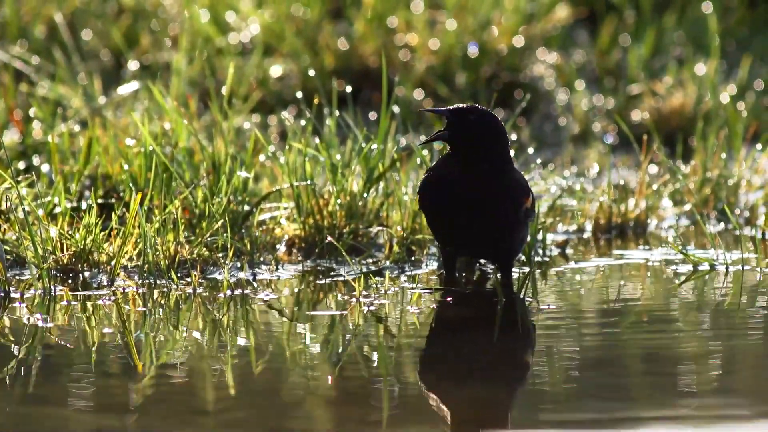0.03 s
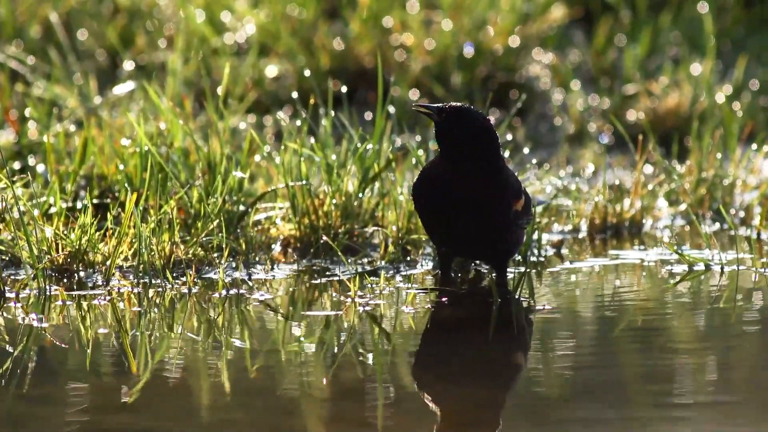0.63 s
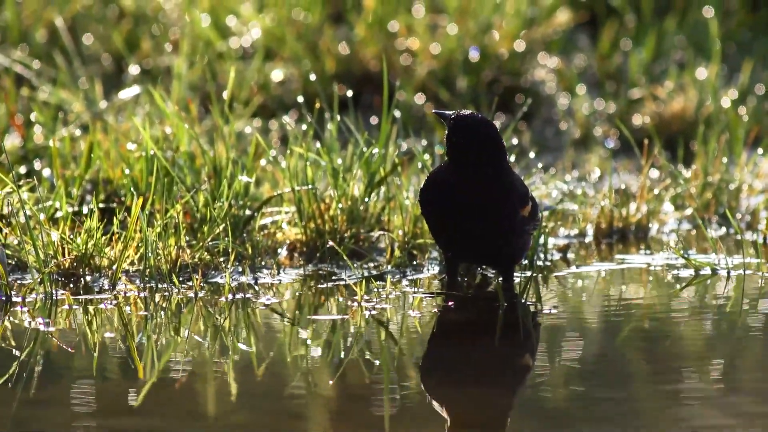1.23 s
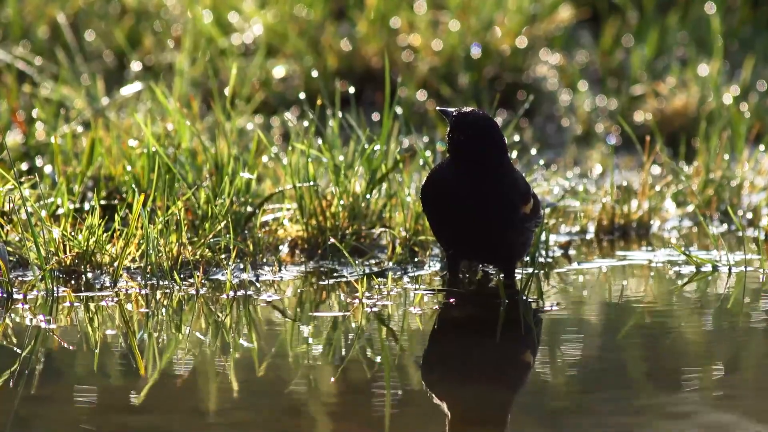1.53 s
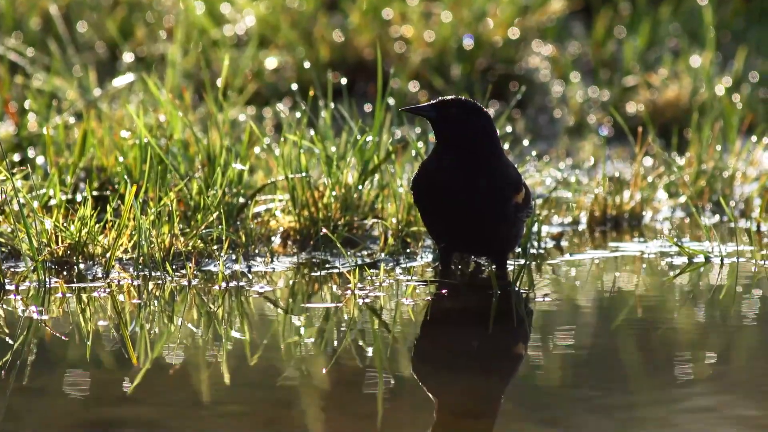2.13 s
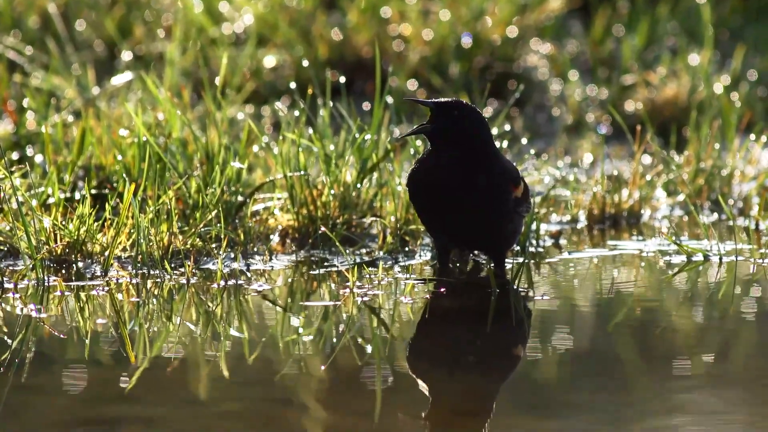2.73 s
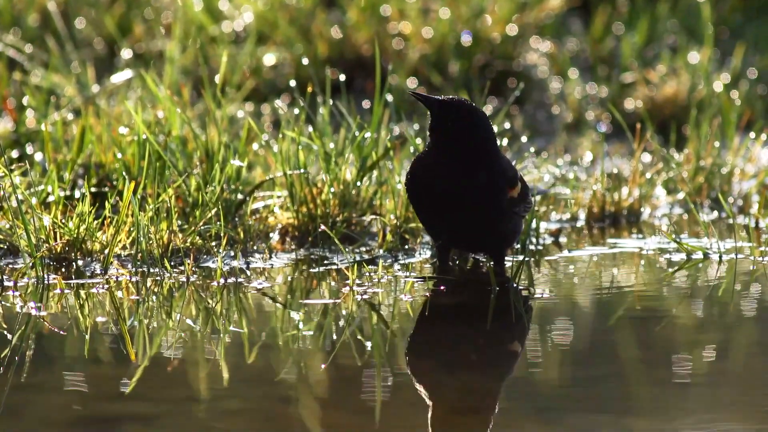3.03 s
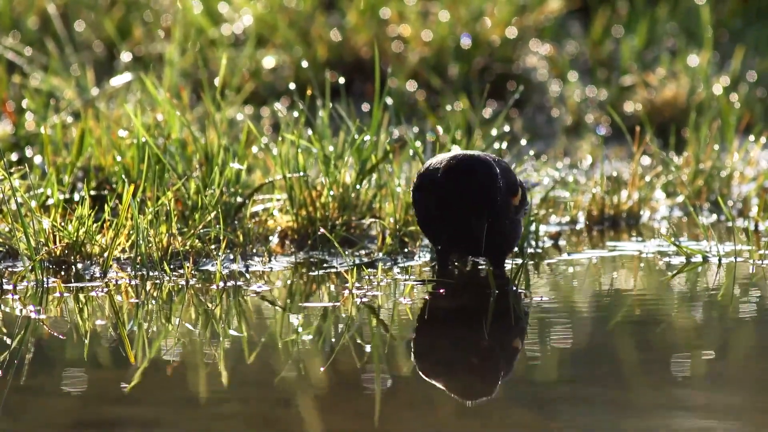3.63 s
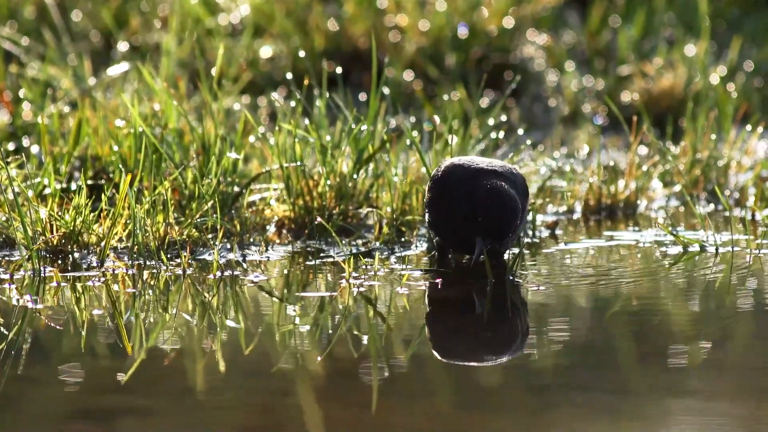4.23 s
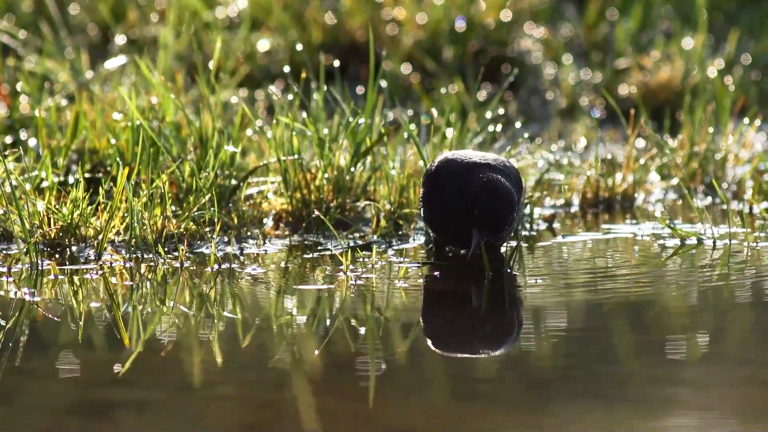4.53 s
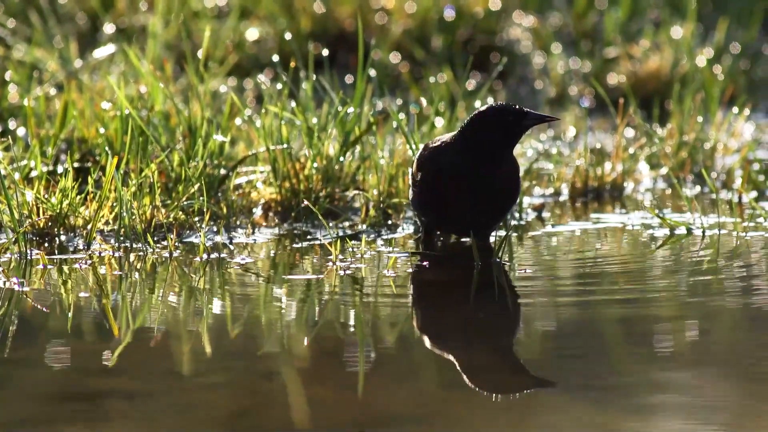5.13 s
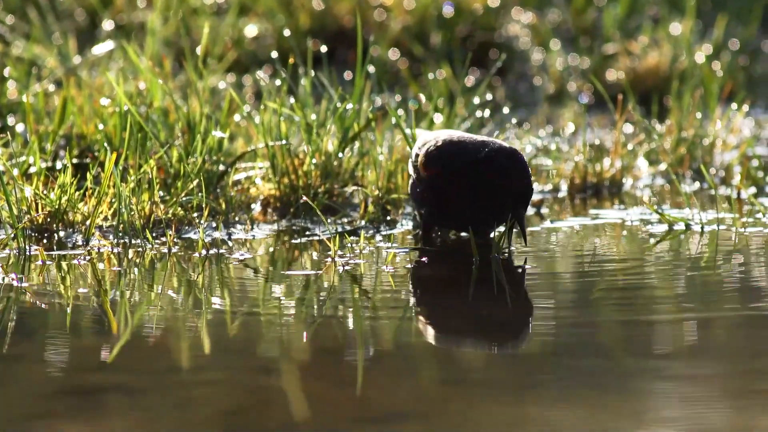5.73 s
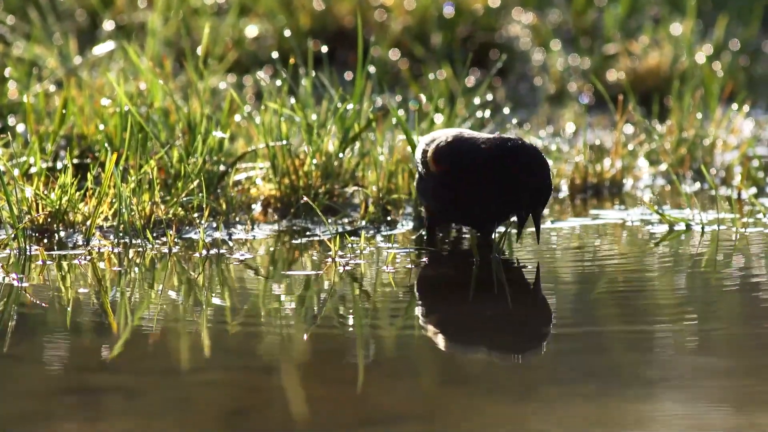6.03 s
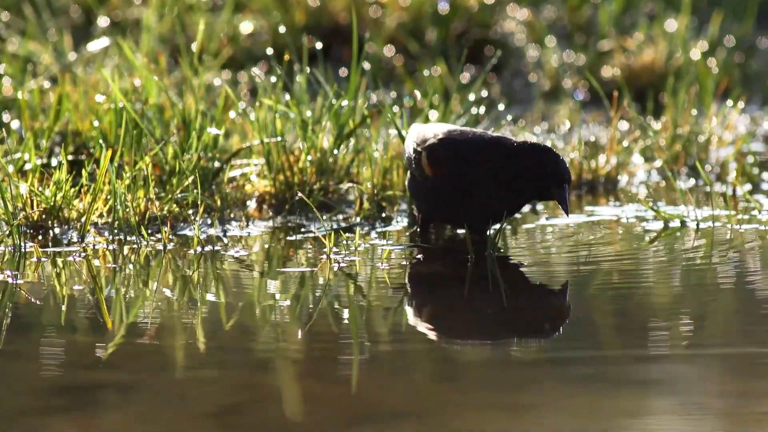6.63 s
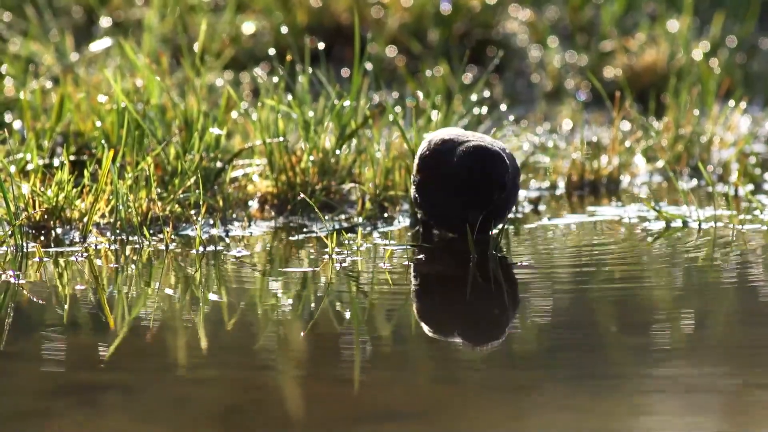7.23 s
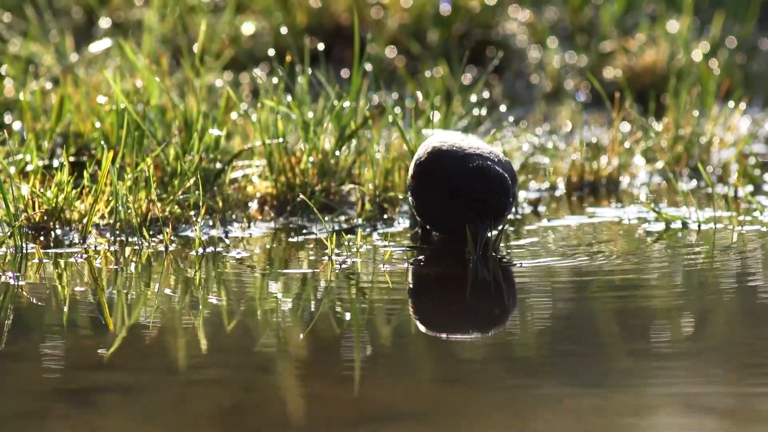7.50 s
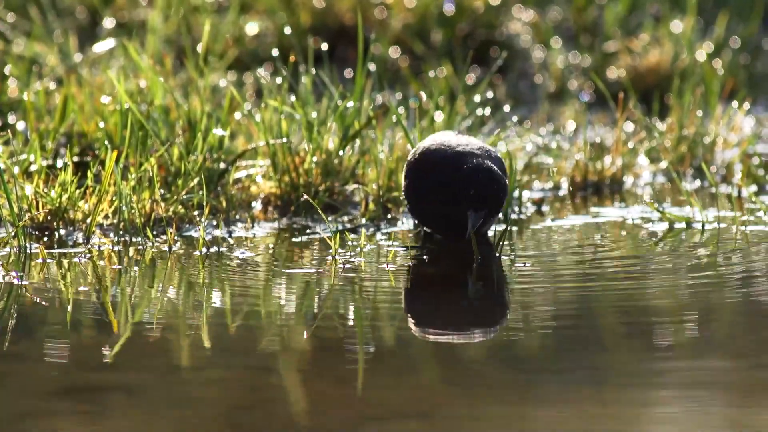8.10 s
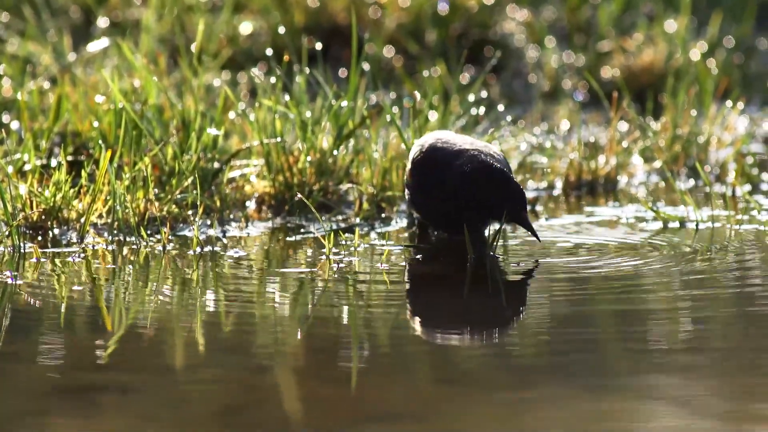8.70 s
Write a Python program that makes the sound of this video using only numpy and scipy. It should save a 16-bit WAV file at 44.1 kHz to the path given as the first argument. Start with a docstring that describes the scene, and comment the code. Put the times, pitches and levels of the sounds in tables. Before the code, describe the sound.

At the water's edge, a nearby blackbird gives a loud, high whistle that slides downward and rings briefly off the shore. It repeats three more times, a few seconds apart, the last two loudest. Farther off, small birds chip, warble and slur throughout, with a thin twitter and faint rustling around the third whistle. A steady distant rumble and occasional soft low thumps lie underneath.

```python
"""Lakeside, over distant rumble and soft low thumps. At 0 s a blackbird gives a loud falling whistle;
a close bank echoes it and the shore rings on. Small birds warble, check and chip farther off, with
slurs from 2 s. Faint far tones sound at 0.4 and 3.7 s, the second whistle and a dry tick between them.
From about 5 s come rustles, reedy rising calls and a thin twitter, with the third whistle at 5.6 s.
The fourth follows at 7.5 s; a few slurs and thumps end the scene."""
import sys
import numpy as np
from scipy import signal
from scipy.fft import rfft, irfft, next_fast_len
from scipy.io import wavfile
from scipy.ndimage import uniform_filter1d

SR = 44100
rng = np.random.default_rng(int(sys.argv[2]) if len(sys.argv) > 2 else 0)


def file_out(sig):
    """Save sig as 16-bit WAV at sys.argv[1]."""
    # one column per channel
    cols = np.atleast_2d(sig).T
    # limit, then scale
    lim = np.clip(cols, -1, 1)
    pcm = np.round(lim * 32767).astype(np.int16)
    wavfile.write(sys.argv[1], SR, pcm)


N = 390726
TIME_S = np.arange(N) / SR
CUTOFF_HZ = 15800

# outdoor background: freq_hz, relative_density_db
AIR_SPECTRUM = [(18, -26), (25, -13), (52, 3), (148, -1.5), (688, -10), (2650, -18.5), (5480, -19),
                (6990, -22.5), (14500, -25.5)]
# far tones: start_s, length_s, pitch_hz, level_db
FAR_NOTES = [(0.424, 0.63, 783, -62), (3.72, 0.47, 472.5, -58.5)]
# low thumps: start_s, level_db
THUMP_HITS = [(0.362, -44), (.43, -35), (1.664, -37), (4.105, -36.5), (4.225, -42), (6.97, -41.5),
              (7.098, -42.5), (7.25, -42.5), (7.958, -38), (8.791, -44.5)]
# high rustles: start_s, length_s, level_db
RUSTLE_PATCHES = [(4.787, 0.2, -58), (5.143, 0.65, -55.5), (6.253, 0.38, -55.5)]
# far bird's rising calls: start_s, length_s, second_partial_db
RISING_CALLS = [(5.218, 0.16, -58), (5.602, 0.16, -58), (6.498, .17, -54)]
# twitter dives: start_s, top_hz, level_db
TWITTER_DIVES = [(5.362, 6500, -53.5), (5.442, 5730, -57), (5.48, 7430, -51), (5.606, 6840, -50),
                 (5.723, 6660, -47.5), (5.824, 6400, -45.5), (5.845, 5300, -54), (5.926, 5950, -53)]
# high hooked notes ending the twitter: start_s
HOOK_STARTS_S = [6.13, 6.252, 6.374, 6.497]
# scratchy checks: start_s, top_hz, level_db
CHECK_CALLS = [(.715, 5700, -51), (1.04, 5670, -47.5), (4.291, 6470, -47), (4.549, 5720, -43),
               (6.987, 6470, -49), (7.058, 5340, -47.5), (7.17, 5620, -49), (7.514, 6300, -45),
               (7.664, 5900, -45)]
# sinking slurs: start_s, length_s, first_hz, bow_hz, relative_db
SLUR_NOTES = [(2.039, 0.14, 4335, 228, -41), (2.62, 0.15, 4180, 255, -41), (3.213, 0.15, 4150, 313, -40.5),
              (3.782, 0.19, 3967, 151.5, -46), (3.803, 0.15, 5700, -100, -39.5), (4.52, .21, 4530, 89, -42),
              (5.105, 0.14, 4060, 44, -47), (5.612, 0.16, 3890, 117, -51.5), (6.215, 0.17, 3930, 60, -58.5),
              (6.826, 0.16, 3830, 3, -54), (7.288, 0.21, 3860, 141, -53), (7.99, 0.079, 4130, -150, -52),
              (8.462, 0.16, 3990, 54, -51.5)]
# scooping warbles: start_s, length_s, first_hz, last_hz, relative_db
WARBLE_NOTES = [(0.255, .11, 3540, 4580, -54), (0.38, 0.12, 3720, 3790, -50.5),
                (0.651, 0.15, 3700, 4520, -55), (0.898, 0.12, 3840, 3860, -53),
                (0.95, 0.25, 3610, 5020, -53.5), (1.315, 0.19, 4040, 4100, -53),
                (1.489, .11, 3370, 3320, -58.5), (3.178, 0.07, 2960, 3920, -54.5),
                (3.366, 0.063, 4570, 5070, -49.5), (4.944, .045, 4890, 5100, -54),
                (7.923, .07, 3840, 4380, -54)]
# arched pips: start_s, base_hz
PIP_NOTES = [(1.26, 4250), (1.755, 4300), (4.13, 3400), (4.335, 3360), (7.09, 3550), (7.148, 3480)]
# diving chips: start_s, length_s, last_hz, level_db
CHIP_NOTES = [(0.899, 0.03, 4100, -48.5), (1.021, 0.038, 4400, -50), (1.156, 0.057, 4000, -45),
              (1.322, 0.054, 4000, -45), (1.487, 0.053, 3900, -43), (1.641, 0.063, 3850, -44.5),
              (1.806, 0.06, 3300, -45.5), (1.989, 0.053, 4200, -44), (2.343, 0.057, 3050, -46),
              (2.479, 0.073, 3800, -44.5), (2.693, 0.045, 4000, -41.5), (2.847, 0.057, 4000, -42),
              (3.029, 0.054, 3800, -43.5), (3.471, 0.055, 3150, -44), (3.615, 0.066, 3700, -42),
              (3.864, 0.049, 4300, -45.5), (4.54, 0.036, 4700, -46)]
# blackbird contours, one list of points per whistle: time_s, pitch_hz, level_db
WHISTLE_CURVES = [
    [(0.0, 7870, -18), (0.007, 7500, -35), (0.022, 7240, -39.5), (0.122, 7085, -33), (0.183, 6740, -27.5),
     (0.28, 6475, -21.5), (0.363, 5936, -24), (0.385, 5777, -17.5), (0.414, 5530, -16), (0.447, 5240, -21),
     (0.464, 5120, -30)],
    [(2.468, 8370, -44), (2.489, 7540, -30.5), (2.51, 7200, -28.5), (2.622, 6776, -28), (2.657, 6597, -19),
     (2.788, 6300, -23), (2.865, 6050, -23), (2.88, 6000, -15.5), (2.954, 5570, -11), (3.012, 5183, -18.5),
     (3.03, 5124, -24)],
    [(5.631, 8330, -37), (5.658, 7590, -30), (5.707, 7160, -19), (5.794, 6850, -20.5), (5.861, 6675, -18),
     (5.942, 6270, -12), (5.951, 6240, -18), (6.067, 5705, -13), (6.087, 5390, -7.5), (6.096, 5150, -11.5),
     (6.13, 5047, -22.5)],
    [(7.459, 8350, -26.5), (7.473, 7560, -23.5), (7.489, 7204, -22.1), (7.596, 6900, -24),
     (7.679, 6634, -14), (7.771, 6125, -18), (7.85, 5856, -10), (7.88, 5720, -9.5), (7.902, 5380, -8.5),
     (7.944, 5180, -11), (7.954, 5340, -20)],
]
# timbre per whistle: first_octave_db, last_octave_db, hollow_hz, bank_echo_db
WHISTLE_COLOURS = [(5, -2, 12000, 0), (1, -1, 12950, -5), (0.5, 1.5, 6800, -11), (-3.5, 10, 12100, -12)]
# close-bank echo per whistle: delay_s
BANK_DELAYS_S = [.00401, .00437, .00423, .00421]
# throat and beak response to the octave: freq_hz, gain_db
THROAT_RESPONSE = [(10000, -15.5), (10400, -28.5), (10850, -24.5), (11300, -41), (12400, -44), (13200, -44),
                   (13700, -34), (14200, -37.5), (15500, -50.5)]
# hoarse spells: start_s, length_s, flutter_hz, level_re_voice_db
HOARSE_SPELLS = [(0.303, 0.092, 1480, -34), (5.68, .21, 1380, -28.5), (7.572, 0.091, 1170, -28.5)]
# voice cracks near the whistle peaks: start_s, level_db
VOICE_CRACKS = [(2.882, -42), (5.988, -43.5), (7.838, -40)]


def from_db(db):
    """Decibels to gain."""
    return 10 ** (np.asarray(db) / 20)


def rms_one(x):
    """Scale to unit power."""
    return x / np.sqrt(np.mean(x ** 2) + 1e-20)


def band(x, low_hz, high_hz):
    """Gentle band-pass."""
    return signal.sosfilt(signal.butter(2, [low_hz, high_hz], "band", fs=SR, output="sos"), x)


def drift(rate_hz, size=N):
    """Smooth random wander, unit RMS."""
    hz = np.arange(size // 2 + 1) * SR / size
    return rms_one(irfft(rfft(rng.standard_normal(size)) / (1 + (hz / rate_hz) ** 2), size))


def sine(hz):
    """Unit-power tone along a pitch curve."""
    return np.sqrt(2) * np.sin(2 * np.pi * np.cumsum(hz) / SR)


def progress(length_s):
    """Ramp u from 0 to 1 over a note."""
    return np.linspace(0, 1, int(length_s * SR))


def swell(u, edge):
    """Rounded rise and fall, each the fraction edge of a note."""
    return np.sin(np.pi / 2 * np.clip(np.minimum(u, 1 - u) / edge, 0, 1))


def glide(u, first_hz, last_hz, bow_hz):
    """Pitch slide, bowed in the middle; positive is upward."""
    return first_hz + (last_hz - first_hz) * u + bow_hz * (1 - (2 * u - 1) ** 2)


def add(track, start_s, sound):
    """Mix a sound into a track."""
    at = int(start_s * SR)
    track[at:at + len(sound)] += sound[:N - at]


def delayed(x, delay_s):
    """Longer path: a fractional-sample delay."""
    size = next_fast_len(len(x) + SR // 10)
    hz = np.arange(size // 2 + 1) * SR / size
    return irfft(rfft(x, size) * np.exp(-2j * np.pi * hz * delay_s), size)[:len(x)]


def scatter(x, first_s, t60_s):
    """Dense, decaying reflections from grass, banks and trees."""
    t = TIME_S[:int(t60_s * SR)]
    echoes = rng.standard_normal(len(t)) * from_db(-60 * t / t60_s)
    return delayed(signal.fftconvolve(x, echoes / np.linalg.norm(echoes))[:N], first_s)


def air(level_db=-48):
    """Distant rumble thinning into hiss."""
    hz, db = np.transpose(AIR_SPECTRUM)
    bins_hz = np.maximum(np.arange(N // 2 + 1) * SR / N, 1)
    shape = from_db(np.interp(np.log(bins_hz), np.log(hz), db))
    return from_db(level_db) * rms_one(irfft(rfft(rng.standard_normal(N)) * shape, N))


def far_tones():
    """Steady far pitches, fading in and out in the moving air."""
    out = np.zeros(N)
    for start_s, length_s, hz, db in FAR_NOTES:
        u = progress(length_s)
        add(out, start_s, from_db(db) * swell(u, edge=0.091) * sine(np.full(len(u), hz)))
    return out


def thumps(pitch_hz=81, length_s=0.16, peak_s=0.024):
    """Dull bumps that swell for two cycles and die away."""
    out = np.zeros(N)
    u = progress(length_s)
    age = u * length_s / peak_s
    envelope = (age * np.exp(1 - age)) ** 2
    for start_s, db in THUMP_HITS:
        body = sine(pitch_hz * (1 + 0.071 * drift(18, len(u))))
        add(out, start_s, from_db(db) * envelope * body)
    return out


def rustles(grain_db=4):
    """Patches of grainy hiss; four bands flicker independently."""
    envelope = np.zeros(N)
    for start_s, length_s, db in RUSTLE_PATCHES:
        add(envelope, start_s, from_db(db) * swell(progress(length_s), edge=0.2))
    edges_hz = np.geomspace(3800, 7600, num=5)
    grains = np.zeros(N)
    for low_hz, high_hz in zip(edges_hz, edges_hz[1:]):
        hiss = band(rng.standard_normal(N), low_hz, high_hz) / low_hz
        grains += hiss * from_db(grain_db * drift(60))
    return envelope * rms_one(grains)


def tick(start_s=3.335, length_s=0.034, level_db=-42.5, fade_db=22):
    """One faint, dry snap in the grass."""
    envelope = np.zeros(N)
    add(envelope, start_s, from_db(level_db - fade_db * progress(length_s)))
    return envelope * rms_one(band(rng.standard_normal(N), 710, 5900))


def chorus(count=26, until_s=5.8, note_s=0.056, low_hz=3200, high_hz=4500, level_db=-57):
    """Farthest birds: soft wavering notes sliding up or down at random."""
    out = np.zeros(N)
    for k, (offset, stretch, first, last) in enumerate(rng.random((count, 4))):
        start_s = until_s * (k + 1 + offset) / count
        u = progress(note_s * (0.5 + stretch))
        height = first + (last - first) * u + drift(40, len(u)) / 20
        pitch_hz = low_hz + (high_hz - low_hz) * height
        add(out, start_s, from_db(level_db) * swell(u, edge=0.27) * sine(pitch_hz))
    return out


def rises(low_hz=1600, high_hz=3350, hold=0.46, fundamental_db=-1.5, wet_db=-4):
    """Reedy call: holds low, then climbs an octave; second partial strongest."""
    out = np.zeros(N)
    for start_s, length_s, db in RISING_CALLS:
        u = progress(length_s)
        pitch_hz = np.interp(u, [hold, 1], [low_hz, high_hz]) * (1 + 0.0137 * drift(67, len(u)))
        partials = from_db(fundamental_db) * sine(pitch_hz) + sine(2 * pitch_hz)
        add(out, start_s, from_db(db) * swell(u ** 2, edge=0.27) * partials)
    return out + from_db(wet_db) * scatter(out, first_s=0.013, t60_s=0.19)


def twitter(aim_hz=2310, fall=0.7, high_hz=8900, hook_hz=5050, hook_db=-51,
            reply_lag_s=0.043, reply_db=-50, flutter_db=5, wet_db=-5):
    """Thin quick dives, then high plunges that hook upward, alternating with low dives."""
    dive_u, hook_u = progress(length_s=0.03), progress(length_s=0.075)
    replies = [(start_s + reply_lag_s, hook_hz, reply_db) for start_s in HOOK_STARTS_S[:-1]]
    notes = [(start_s, top_hz - fall * (top_hz - aim_hz) * dive_u, db)
             for start_s, top_hz, db in TWITTER_DIVES + replies]
    hook_shape = (1 - 2 * hook_u) ** 2 * np.where(hook_u < 0.5, 1, 0.2)
    hook_curve_hz = hook_hz + (high_hz - hook_hz) * hook_shape
    notes += [(start_s, hook_curve_hz, hook_db) for start_s in HOOK_STARTS_S]
    out = np.zeros(N)
    for start_s, pitch_hz, db in notes:
        u = np.linspace(0, 1, len(pitch_hz))
        envelope = from_db(db + flutter_db * drift(80, len(u))) * swell(u, edge=0.35)
        add(out, start_s, envelope * sine(pitch_hz * (1 + 0.016 * drift(120, len(u)))))
    return out + from_db(wet_db) * scatter(out, first_s=0.0058, t60_s=0.25)


def checks(dive_s=0.034, step_s=0.012, fall=0.47, fade_db=4, wet_db=-11):
    """Scratchy call: one ragged dive chased by two steeper, weaker ones."""
    out = np.zeros(N)
    for start_s, top_hz, db in CHECK_CALLS:
        for k in range(3):
            u = progress(dive_s / (1 + k / 2))
            pitch_hz = top_hz * (1 - fall * u + 0.034 * drift(250, len(u)))
            envelope = from_db(db - k * fade_db) * swell(u, edge=0.31)
            add(out, start_s + k * step_s, envelope * sine(pitch_hz))
    return out + from_db(wet_db) * scatter(out, first_s=0.011, t60_s=0.11)


def thin_notes(slur_end_hz=3307, scoop_hz_per_s=2500, pip_s=0.028, pip_arch_hz=500,
               pip_relative_db=-53, flutter_db=2.5, wet_db=-9, gain_db=-1.05):
    """Far birds' bowed glides: sinking slurs, scooping warbles, arched pips."""
    notes = [(start_s, length_s, first_hz, slur_end_hz, bow_hz, db)
             for start_s, length_s, first_hz, bow_hz, db in SLUR_NOTES]
    notes += [(start_s, length_s, first_hz, last_hz, -scoop_hz_per_s * length_s, db)
              for start_s, length_s, first_hz, last_hz, db in WARBLE_NOTES]
    notes += [(start_s, pip_s, hz, hz, pip_arch_hz, pip_relative_db) for start_s, hz in PIP_NOTES]
    out = np.zeros(N)
    for start_s, length_s, first_hz, last_hz, bow_hz, db in notes:
        u = progress(length_s)
        pitch_hz = glide(u, first_hz, last_hz, bow_hz) * (1 + 0.0093 * drift(70, len(u)))
        envelope = from_db(db + flutter_db * drift(36, len(u))) * swell(u ** 1.14, edge=0.2)
        add(out, start_s, envelope * sine(pitch_hz))
    return from_db(gain_db) * (out + from_db(wet_db) * scatter(out, first_s=0.0048, t60_s=0.34))


def chips(top_hz=6340, bow_hz=120, waver=0.021, flutter_db=2, wet_db=-6):
    """Steepening dives from one top pitch, each with its own kink."""
    out = np.zeros(N)
    for start_s, length_s, last_hz, db in CHIP_NOTES:
        u = progress(length_s)
        kink = rng.standard_normal() * np.sin(2 * np.pi * u)
        pitch_hz = glide(u, top_hz, last_hz, bow_hz) * (1 + waver * (kink + drift(64, len(u))))
        envelope = from_db(db + flutter_db * drift(80, len(u))) * swell(u, edge=0.24)
        add(out, start_s, envelope * sine(pitch_hz))
    return out + from_db(wet_db) * scatter(out, first_s=0.0066, t60_s=0.14)


def cracks(length_s=0.1, fade_db=19, grain_db=2, low_band_db=-1):
    """The voice catches: decaying crackle around the tone and its octave."""
    envelope = np.zeros(N)
    u = progress(length_s)
    for start_s, db in VOICE_CRACKS:
        add(envelope, start_s, from_db(db - fade_db * u) * swell(u, edge=0.08))
    noise = rng.standard_normal(N)
    hiss = band(noise, 11500, 14200) + from_db(low_band_db) * band(noise, 5200, 7600)
    return envelope * rms_one(hiss * from_db(grain_db * drift(600)))


def hoarseness(voice, spin_up_s=0.024, jitter=0.16, second_db=-8):
    """A fast flutter gathers speed in the voice, adding two sidebands above it."""
    flutter = np.zeros(N, complex)
    for start_s, length_s, flutter_hz, db in HOARSE_SPELLS:
        u = progress(length_s)
        spin_up = 1 - 0.5 * np.exp(-u * length_s / spin_up_s)
        rate_hz = flutter_hz * spin_up * (1 + jitter * drift(600, len(u)))
        phasor = np.exp(2j * np.pi * np.cumsum(rate_hz) / SR)
        sidebands = phasor + from_db(second_db) * phasor ** 2
        add(flutter, start_s, from_db(db) * swell(u, edge=0.33) * sidebands)
    return np.real(signal.hilbert(voice) * flutter)


def whistle(curve, colour, echo_s, flutter_db=1.36, third_db=-16, hollow_db=-16, hollow_width_hz=170):
    """Nearly pure falling glide with overtones; the bank echo beats against it."""
    first_octave_db, last_octave_db, hollow_hz, echo_db = colour
    times_s, hz, db = np.transpose(curve)
    length_s = times_s[-1] - times_s[0]
    u = progress(length_s)
    t = times_s[0] + u * length_s
    pitch_hz = np.interp(t, times_s, hz) * (1 + 0.0018 * drift(150, len(u)))
    gate = swell(u, edge=0.013) * from_db(flutter_db * drift(77, len(u)))
    tone = gate * from_db(np.interp(t, times_s, db)) * sine(pitch_hz)
    # the third partial enters as it sinks to the cutoff
    third_gate = np.clip((CUTOFF_HZ - 3 * pitch_hz) / 300 + 1, 0, 1)
    third = from_db(third_db) * third_gate * sine(3 * pitch_hz)
    octave_db = first_octave_db + (last_octave_db - first_octave_db) * u
    octave_db += np.interp(2 * pitch_hz, *np.transpose(THROAT_RESPONSE))
    octave_db += hollow_db * np.exp(-((2 * pitch_hz - hollow_hz) / hollow_width_hz) ** 2)
    overtones = gate * swell(u, edge=0.1) * from_db(octave_db) * (sine(2 * pitch_hz) + third)
    # overtones are beamed narrowly and miss the bank
    margin = (0, SR // 100)
    echo = from_db(echo_db) * delayed(np.pad(tone, margin), echo_s)
    return np.pad(tone + overtones, margin) + echo


def blackbird(grass_db=-15, shore_db=-20.5, trees_db=-32):
    """Four whistles with grass scatter, a short shore ring and a long, duller one from the trees."""
    voice, sideways = np.zeros(N), np.zeros(N)
    for curve, colour, echo_s in zip(WHISTLE_CURVES, WHISTLE_COLOURS, BANK_DELAYS_S):
        start_s, echo_db = curve[0][0], colour[-1]
        call = whistle(curve, colour, echo_s)
        add(voice, start_s, call)
        add(sideways, start_s, from_db(echo_db) * call)
    grass = from_db(grass_db) * scatter(band(sideways, 2000, 7000), first_s=0.0051, t60_s=0.041)
    shore = from_db(shore_db) * scatter(band(voice + sideways, 1800, 11000), first_s=0.016, t60_s=0.34)
    trees = from_db(trees_db) * scatter(band(voice, 2000, 7900), first_s=0.025, t60_s=1.02)
    return voice + hoarseness(voice) + cracks() + grass + shore + trees


def scene():
    """All sources at one microphone, alike in both channels."""
    birds = blackbird() + chips() + checks() + twitter() + thin_notes() + rises() + chorus()
    mono = birds + tick() + thumps() + far_tones() + rustles() + air()
    return np.array([mono, mono])


def record(dry, knee_db=-17, squeeze=0.18, release_db_per_s=150):
    """Gain control ducks slightly under the loudest whistles; a steep low-pass follows."""
    level_db = 10 * np.log10(np.maximum(uniform_filter1d(dry[0] ** 2, size=256), 1e-12))
    excess_db = np.maximum(level_db - knee_db, 0)
    release_db = release_db_per_s * TIME_S
    held_db = np.maximum.accumulate(excess_db + release_db) - release_db
    ducked = dry * from_db(-squeeze * uniform_filter1d(held_db, size=256))
    return signal.sosfilt(signal.ellip(12, 0.1, 80, CUTOFF_HZ, fs=SR, output="sos"), ducked)


dry = scene()
out = record(dry)
file_out(out)
```